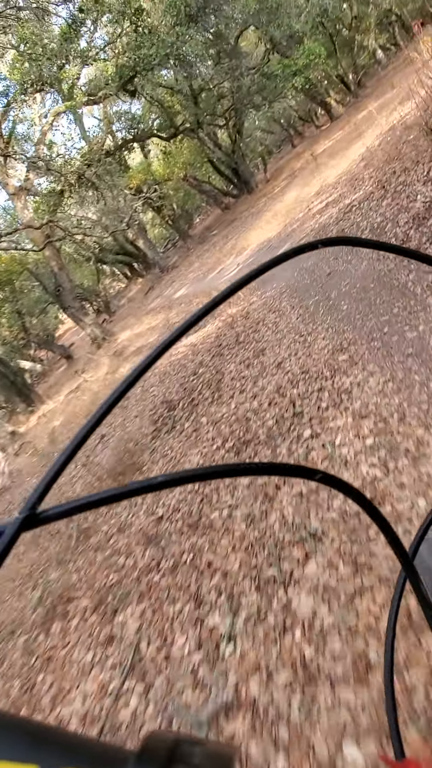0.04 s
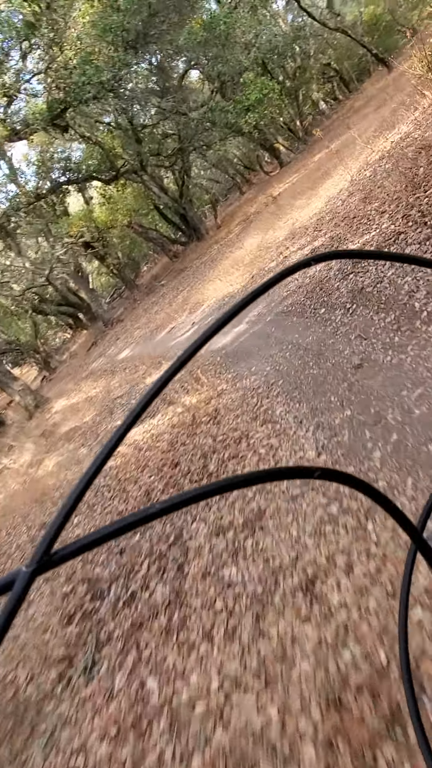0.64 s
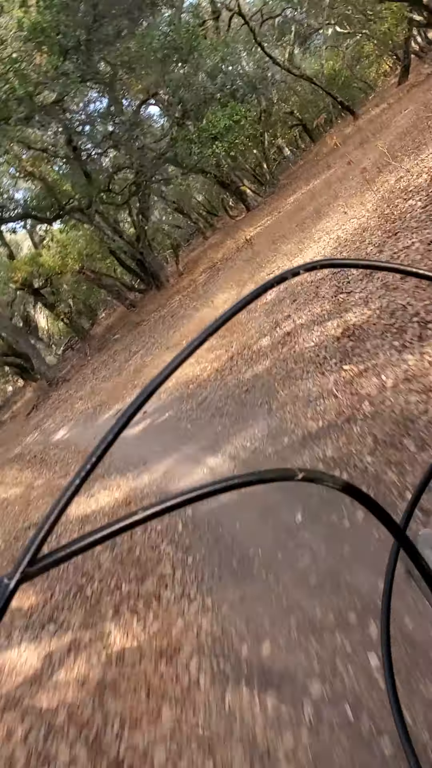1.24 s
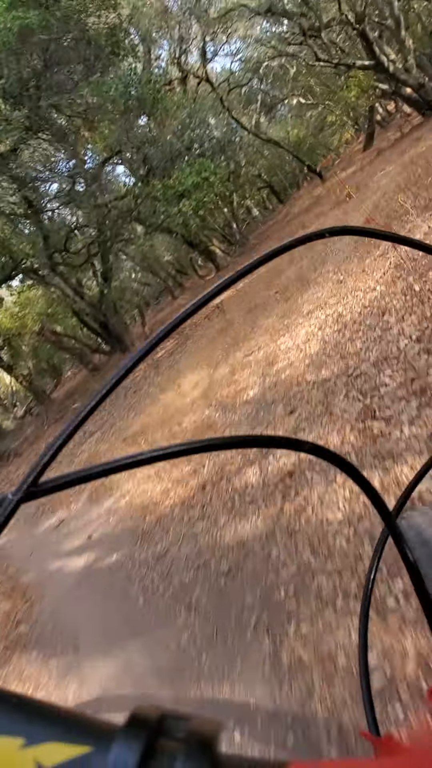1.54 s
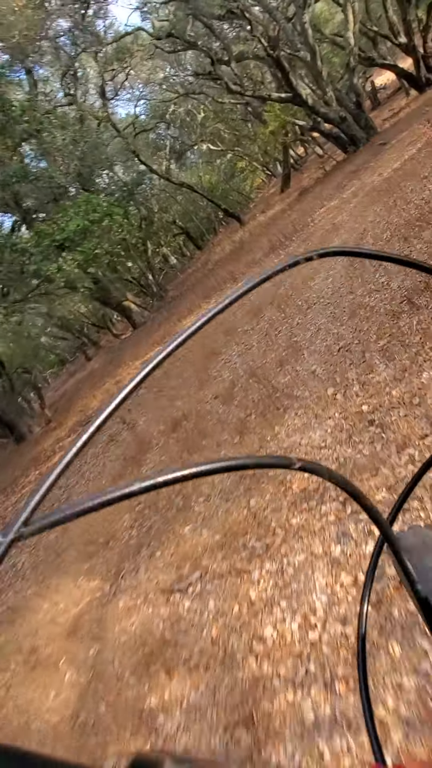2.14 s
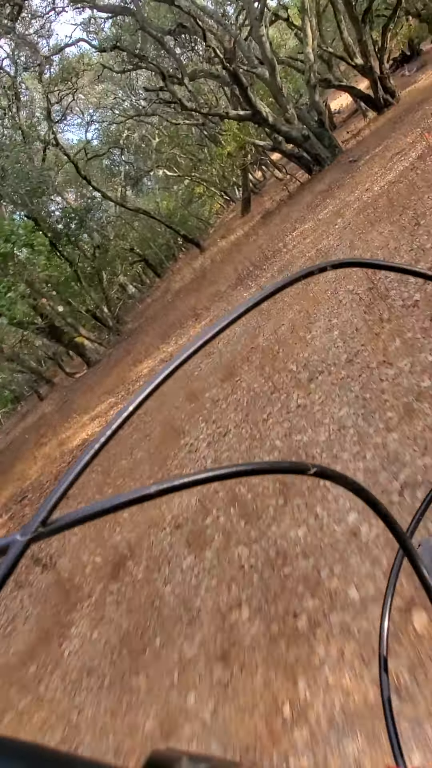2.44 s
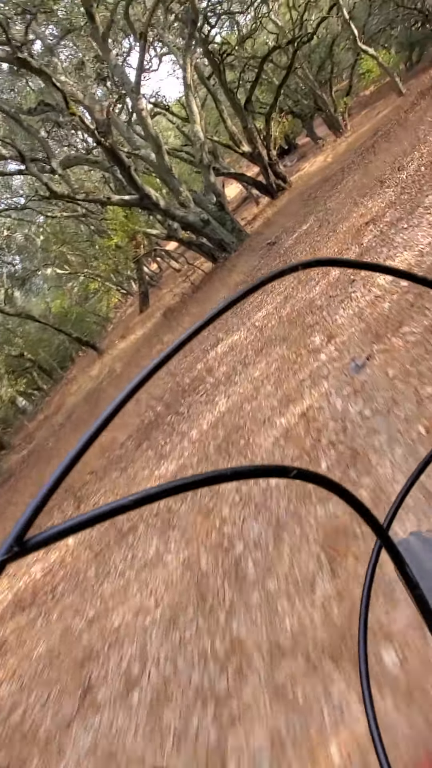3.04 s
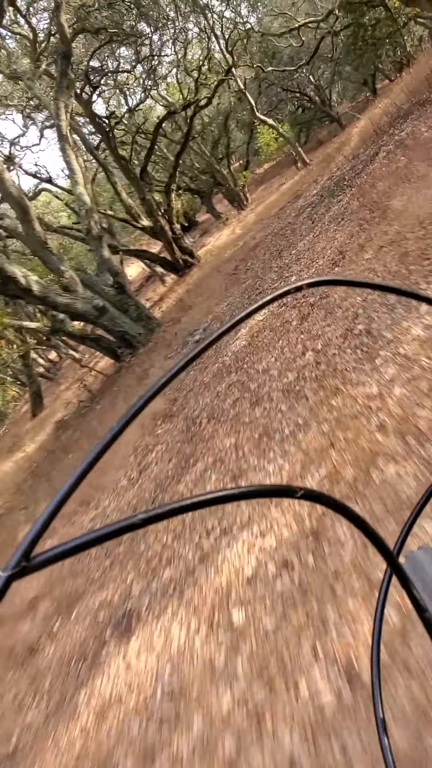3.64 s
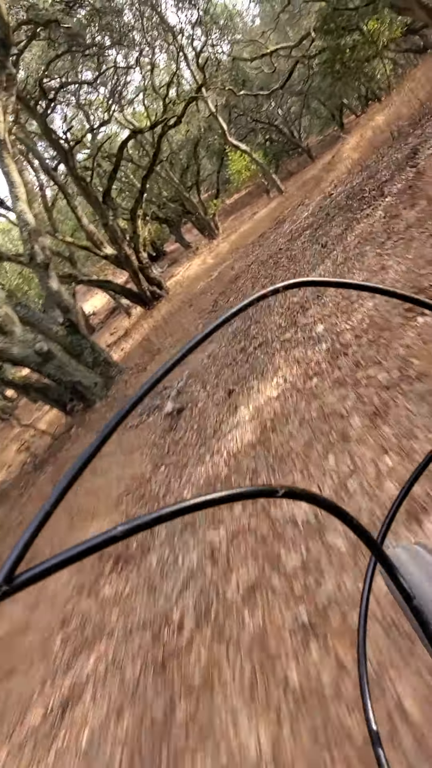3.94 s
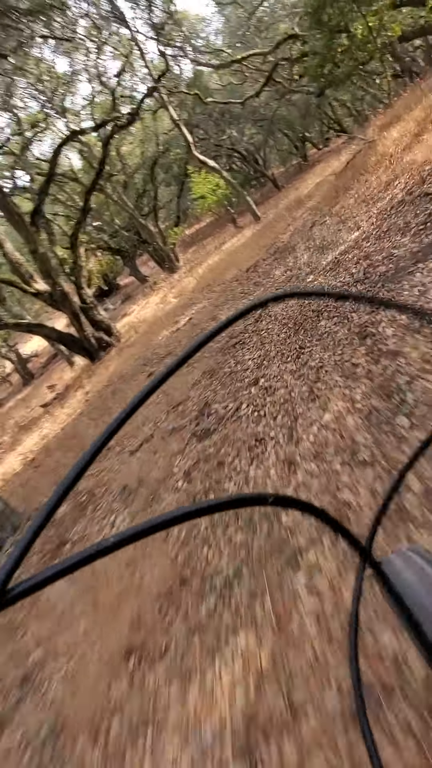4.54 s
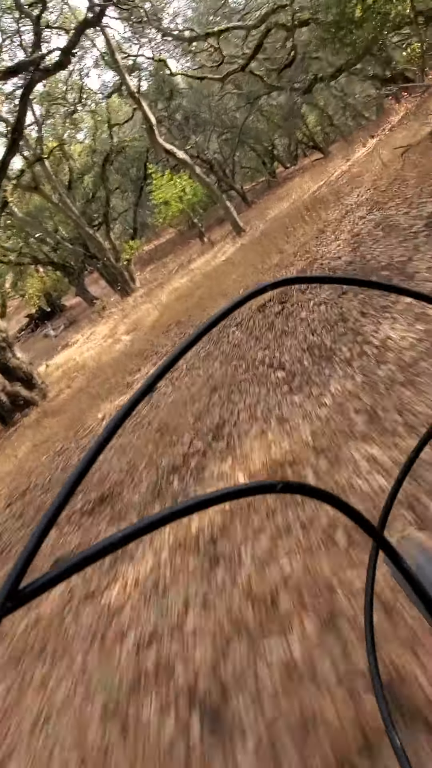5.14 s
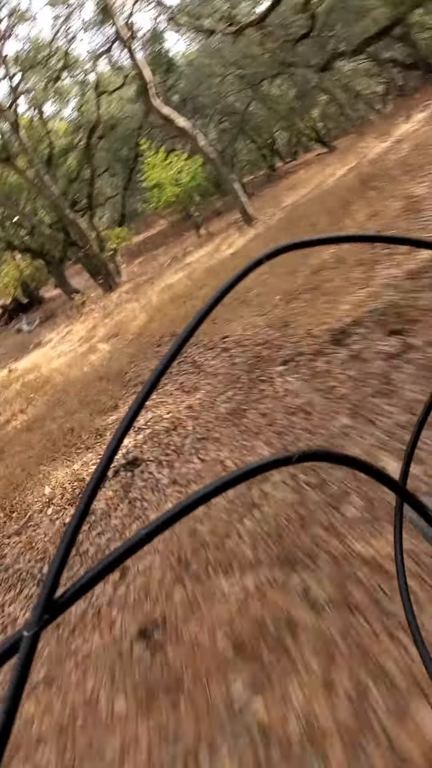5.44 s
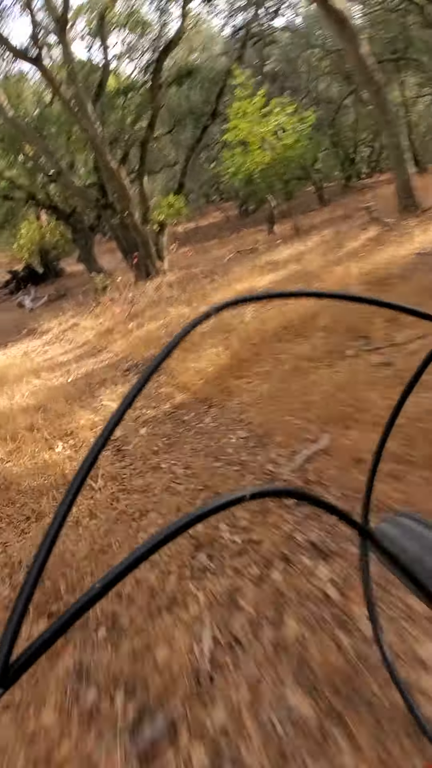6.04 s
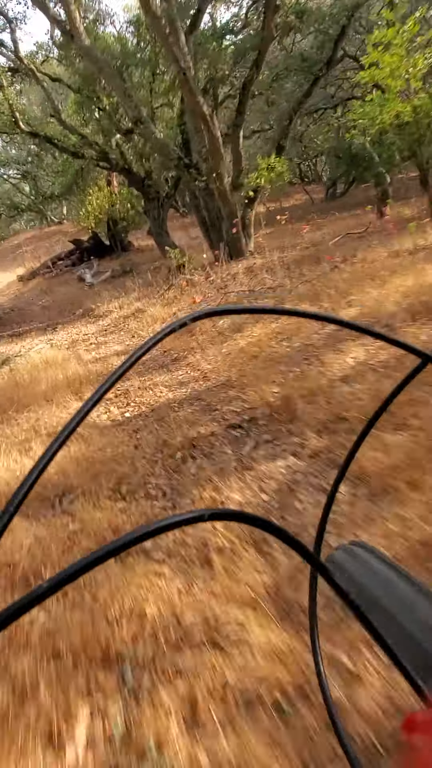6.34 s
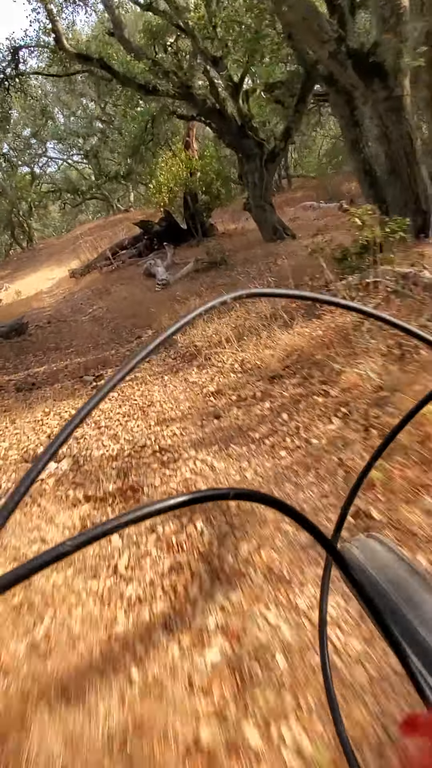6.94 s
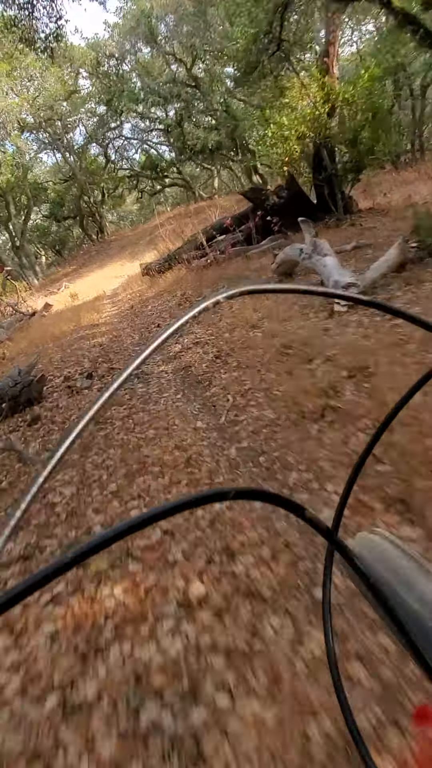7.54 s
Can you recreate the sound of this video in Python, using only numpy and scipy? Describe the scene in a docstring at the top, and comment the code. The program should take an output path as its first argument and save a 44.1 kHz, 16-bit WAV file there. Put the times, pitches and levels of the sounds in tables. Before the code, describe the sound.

Mountain bike tyres crunch over dry leaves and dirt, the frame knocking and rattling on bumps as wind buffets the microphone.

```python
"""Dry leaves crunch and a frame knocks as a mountain bike rolls down a dirt trail in open woodland.
Heard close up, from a camera on the rider with two microphone ports. Rough ground drums on the hollow
tyres, the tread crushes leaves and snaps twigs, bumps jolt and boom through the frame, and loose parts
clack and faintly ring. From three seconds on, the head wind buffets the ports."""
import sys
import numpy as np
from scipy import signal
from scipy.fft import rfft, irfft, next_fast_len
from scipy.io import wavfile
from scipy.ndimage import map_coordinates

SR = 44100
rng = np.random.default_rng(int(sys.argv[2]) if len(sys.argv) > 2 else 0)


def dump_mix(stems):
    """Bounce the given channels to the path in sys.argv[1] as a 16-bit WAV at rate SR."""
    frames = np.atleast_2d(stems).T  # one column per channel
    limited = np.clip(frames, -1, 1)  # hard clip at full scale
    pcm = np.round(limited * 32767).astype(np.int16)
    wavfile.write(sys.argv[1], SR, pcm)


N = 343539
TOP_HZ = 16050  # the camera's band limit

# Depth of the leaf litter under the tyres. Each row: time in seconds, relative crunch level in dB.
LEAF_LITTER = [(0, -40), (.2, -48.5), (.57, -44.5), (.88, -45), (1.3, -59), (1.6, -55), (1.95, -45),
               (2.5, -46), (2.8, -49.5), (3.47, -48.5), (3.69, -45), (4.7, -46), (5.2, -39), (5.72, -48.5),
               (6.03, -42.5), (6.33, -50), (7.16, -55.5), (7.79, -50.5)]
# Riding noise. Each row: time in seconds, relative levels of roar and of rumble in dB.
RIDE_LEVELS = [(0, -32, -35.5), (.4, -38, -42), (.95, -38, -40.5), (1.1, -34.5, -33), (1.53, -29, -33),
               (1.83, -36, -38), (2.4, -38.5, -41), (2.58, -32, -38.5), (3.08, -36.5, -42),
               (3.3, -33.5, -33), (3.65, -32, -35), (4.2, -31, -38.5), (5.1, -30.5, -33.5),
               (5.45, -30.5, -39), (6.02, -31, -40.5), (6.4, -37.5, -40.5), (7.1, -33, -41),
               (7.79, -32, -34.5)]
# Modes of the struck frame. Each row: frequency in Hz, relative level in dB, t60 in seconds.
FRAME_MODES = [(353, -8, 0.026), (814, -7.5, 0.031), (1607, -5, 0.027), (2156, 3, 0.009),
               (3150, -19, 0.006), (3790, 0, 0.007), (5970, -38, .008), (10030, -8.5, 0.023)]
# Colour of snaps, cracks and rattles. Each row: frequency in Hz, relative level in dB.
SNAP_SPECTRUM = [(400, 7.5), (1000, 7), (2100, 6.5), (3500, 0), (5000, -3.5), (7500, -15.5), (9800, 0),
                 (16000, -13)]


def amp(db):
    """Decibels to gain."""
    return 10 ** (np.asarray(db) / 20)


def unit(x):
    """Scale to rms 1."""
    return x / np.sqrt(np.mean(x ** 2) + 1e-20)


def curves(rows):
    """One value per sample for each column after the time."""
    times, *columns = np.transpose(rows)
    return [np.interp(np.arange(N) / SR, times, column) for column in columns]


def swells(rows, half_s):
    """A dB curve with one smooth swell for each (s, dB)."""
    t = np.arange(N) / SR
    return sum(db * np.exp(-np.minimum(((t - s) / half_s) ** 2, 20)) for s, db in rows)


def wobble(rate):
    """A smooth random curve, rate knots a second."""
    return map_coordinates(rng.standard_normal(int(N * rate / SR) + 4), [np.arange(N) * rate / SR])


def chance(per_s, level_db, scatter_db):
    """Random events (s, dB) whose strength follows a level curve."""
    when, size = rng.random((int(per_s * N / SR), 2)).T
    return list(zip(when * N / SR, level_db[(when * N).astype(int)] + scatter_db * (2 * size - 1)))


def filtered(x, response):
    """Filter x by a complex response of frequency."""
    size = next_fast_len(N + SR // 4)
    return irfft(rfft(x, size) * response(np.fft.rfftfreq(size, 1 / SR)), size)[..., :N]


def coloured(x, spectrum):
    """Give x a spectrum of (Hz, dB) points; white noise keeps its power."""
    points_hz, db = np.transpose(spectrum)
    return filtered(x, lambda hz: unit(amp(np.interp(np.log(hz + 1), np.log(points_hz), db))))


def resonance(hz, centre_hz, width_hz):
    """Complex response of one damped mode."""
    return 1j * hz * width_hz / (centre_hz ** 2 - hz ** 2 + 1j * hz * width_hz)


def resonate(x, modes):
    """Pass x through modes (Hz, width Hz, dB) of alternating sign."""
    return filtered(x, lambda hz: sum((-1) ** k * amp(db) * resonance(hz, centre, width)
                                      for k, (centre, width, db) in enumerate(modes)))


def struck(modes, t):
    """Three rows of dying modes (Hz, dB, t60 s), each excited at random strength."""
    return sum(amp(db - 60 * t / t60) * rng.standard_normal((3, 1)) * np.sin(2 * np.pi * hz * t)
               for hz, db, t60 in modes)


def blend(a, b, share):
    """Cross-fade from a to b at equal power."""
    share = np.clip(share, 0, 1)
    return np.sqrt(1 - share) * a + np.sqrt(share) * b


def ports(rows, direct, side=1, lag_s=0.000355):
    """Row 0 reaches both ports (side 1: right first, -1: left); rows 1 and 2 scatter, one to each."""
    late = filtered(rows[0], lambda hz: np.exp(-2j * np.pi * hz * lag_s))
    return blend(rows[1:], np.array([late, rows[0]])[::side], direct)


def pan(left_db):
    """Gains for a left-minus-right level."""
    return amp([[left_db / 2], [-left_db / 2]])


def add(track, s, sound):
    """Mix a sound into a track at time s."""
    part = track[..., max(0, round(s * SR)):][..., :sound.shape[-1]]
    part += sound[..., :part.shape[-1]]


def lumpy_noise(spectrum, lumpy_db, rate):
    """Noise that comes in quick lumps like turbulence, unrelated at the two ports."""
    lumps = amp(lumpy_db * np.array([wobble(rate), wobble(rate)]))
    return unit(coloured(lumps * rng.standard_normal((2, N)), spectrum))


def singing_metal(level_db=-58, flicker_db=5.0):
    """Constant shaking keeps the bike's metal parts faintly ringing."""
    # Each row: frequency in Hz, width in Hz, relative level in dB.
    metal_modes = [(1620, 90, 4.5), (4743, 50, -6.5), (9460, 100, -8.5), (14905, 110, -4)]
    shaking = amp(flicker_db * wobble(30)) * rng.standard_normal((2, N))
    return amp(level_db) * unit(resonate(shaking, metal_modes))


def clink(start_s=1.517, db=-31, bounces=4, gap_s=0.0097, t60=0.047):
    """Just before a hard bump, a loose steel part chatters against the frame."""
    # Each row: frequency in Hz, relative level in dB.
    steel_modes = [(2950, -4), (3650, -4.5), (4750, -23), (5700, -9), (9400, -13)]
    out, t = np.zeros((3, N)), np.arange(SR // 8) / SR
    for bounce in range(bounces):
        ring = struck([(hz, level, t60) for hz, level in steel_modes], t)
        add(out, start_s + bounce * gap_s, amp(db) * ring)
    return ports(out, direct=0.43)


def twigs_and_pebbles(t60=0.073, ring_db=-14):
    """Twigs snap and pebbles flick off the tread, faintly ringing the frame."""
    # Each row: start in seconds, relative level in dB.
    loud_ticks = [(1.486, -29.5), (2.1, -27.5), (2.1944, -25.5), (2.7018, -28), (4.25, -27), (5.509, -23),
                  (5.6305, -20.5), (6.6378, -27.5)]
    small_twigs = chance(per_s=9, level_db=curves(LEAF_LITTER)[0] + 5.5, scatter_db=6)
    snaps, rings, t = np.zeros((3, N)), np.zeros((3, N)), np.arange(SR // 16) / SR
    for s, db in loud_ticks + small_twigs:
        add(snaps, s, amp(db - 5.0 - 60 * t / t60) * rng.standard_normal((3, len(t))))
        add(rings, s, amp(db + ring_db) * struck(FRAME_MODES, t))
    return ports(coloured(snaps, SNAP_SPECTRUM) + rings, direct=0.17)


def clacks(rear_delay_s=0.1362, crack_t60=0.011):
    """A root slaps cable or chain on the frame, once per wheel: its modes ring under a short crack."""
    # Each row: start in seconds, relative levels of front ring, rear ring and crack in dB.
    roots = [(1.181, -1.5, -6.5, -5), (3.6019, -6, -14.5, -9.5)]
    rings, cracks, t = np.zeros((3, N)), np.zeros((3, N)), np.arange(SR // 16) / SR
    rise = 1 - np.exp(-t / 0.00057)
    front = [(s, ring_db, crack_db) for s, ring_db, _, crack_db in roots]
    rear = [(s + rear_delay_s, ring_db, crack_db) for s, _, ring_db, crack_db in roots]
    for s, ring_db, crack_db in front + rear:
        ring = sum((-1) ** k * amp(db + rng.standard_normal() - 60 * t / t60)
                   * np.sin(2 * np.pi * hz * t) for k, (hz, db, t60) in enumerate(FRAME_MODES))
        add(rings, s, amp(ring_db) * ring * rise)
        crack_fade = amp(crack_db + 1.0 - 60 * t / crack_t60) * rise
        add(cracks, s, crack_fade * rng.standard_normal((3, len(t))))
    cracks = coloured(cracks, SNAP_SPECTRUM)
    return ports(rings, direct=1.0) * pan(left_db=-1.5) + ports(cracks, direct=0.047)


def jolts(shake_hz=97, heave_hz=42, heave_db=-8, shake_s=0.039):
    """Each dip in the trail shakes bike and camera for a few slow cycles, over one deeper heave."""
    # Each row: start in seconds, relative level in dB.
    dips = [(0.019, -23.5), (0.128, -23.5), (0.5, -21.5), (.654, -21.5), (0.721, -24), (0.906, -26.5),
            (1.26, -24), (1.373, -25), (1.526, -22.5), (1.964, -29), (2.426, -28), (2.755, -22.5),
            (3.16, -22.5), (3.905, -23.5), (4.482, -25), (5.302, -23.5), (6.14, -23.5)]
    out, t = np.zeros(N), np.arange(SR // 4) / SR
    heave = amp(heave_db) * np.sin(2 * np.pi * heave_hz * t) * np.exp(-t * heave_hz / 2)
    envelope = (1 - np.exp(-t / 0.0025)) * np.exp(-(t / shake_s) ** 2)
    for s, db in dips:
        shake = np.sin(2 * np.pi * shake_hz * t * (1 + 0.066 * rng.standard_normal()))
        add(out, s, amp(db + 3.5) * (shake + heave) * envelope)
    return out * pan(left_db=1.5)


def knocks(relative_width=0.26, bump_hz=422, bump_t60=0.074, bump_rattle_db=-27):
    """Hard hits and small chance bumps boom in the frame, with a brief rattle on top."""
    # Each row: start in seconds, relative level in dB, pitch in Hz, t60 in seconds, rattle offset in dB.
    hard_hits = [(0.003, -23.5, 560, 0.09, -15.5), (1.32, -16.5, 433, 0.068, -17),
                 (1.519, -31, 600, 0.31, -4), (1.551, -15, 548, 0.21, -21.5),
                 (3.151, -24.5, 435, 0.12, -14), (3.186, -21, 300, 0.094, -22),
                 (3.315, -25.5, 450, .12, -29), (3.357, -16, 463, 0.04, -27),
                 (3.738, -25.5, 844, 0.091, -11), (3.905, -23, 405, 0.32, -12),
                 (3.941, -14, 533, 0.16, -28), (5.22, -25, 600, 0.39, -8.5),
                 (5.2827, -8.5, 526, 0.061, -11), (5.294, -9, 380, 0.081, -16),
                 (7.576, -28, 710, 0.25, -15)]
    bumps = chance(per_s=4, level_db=curves(RIDE_LEVELS)[0] + 3.5, scatter_db=3)
    small_hits = [(s, db, bump_hz, bump_t60, bump_rattle_db) for s, db in bumps]
    boom, rattle, t = np.zeros((3, N)), np.zeros((2, N)), np.arange(SR // 3) / SR
    hz = np.fft.rfftfreq(len(t), 1 / SR)
    for s, db, pitch_hz, t60, rattle_db in hard_hits + small_hits:
        body = resonance(hz, pitch_hz, relative_width * pitch_hz) / (1 + (hz / 1100) ** 4)
        fade = amp(-60 * t / t60) * (1 - np.exp(-t / 0.00063))
        ring = fade * irfft(rfft(rng.standard_normal((3, len(t)))) * body, len(t))
        ring *= np.linalg.norm(fade) / np.linalg.norm(ring, axis=1, keepdims=True)
        add(boom, s, amp(db + 3.5) * ring)
        rattle_fade = amp(db + rattle_db + 6.5 - 60 * t / (0.63 * t60))
        add(rattle, s, rattle_fade * rng.standard_normal((2, len(t))))
    return ports(boom, direct=0.58, side=-1) * pan(left_db=-4.0) + coloured(rattle, SNAP_SPECTRUM)


def tyre_hum():
    """Rough ground drums on the hollow tyres."""
    # Each row: frequency in Hz, relative level in dB.
    ground_spectrum = [(100, -11), (200, 1), (750, -2), (1100, -13), (4000, -26)]
    # Each row: frequency in Hz, width in Hz, relative level in dB.
    tyre_modes = [(212, 99, -10.5), (334, 140, -1), (438, 66, 4), (574, 115, -4.5), (736, 93, -4.5)]
    drumming = lumpy_noise(ground_spectrum, lumpy_db=3, rate=50)
    return unit(resonate(drumming, tyre_modes)) * amp(-1.4) * pan(left_db=-1.0)


def head_wind(deep_share):
    """Turbulence roars right at the microphone ports; deep_share of it is big, deep eddies."""
    # Each row of both: frequency in Hz, relative level in dB.
    roar_spectrum = [(60, -35), (150, -8), (300, 0), (430, 0.5), (580, -3.5), (800, -16), (1200, -30),
                     (3000, -51)]
    deep_spectrum = [(60, -30), (140, -1), (220, -1), (400, -8), (600, -14.5), (760, -10), (1100, -18),
                     (3000, -51)]
    roar = lumpy_noise(roar_spectrum, lumpy_db=4.5, rate=120)
    deep_eddies = lumpy_noise(deep_spectrum, lumpy_db=5.0, rate=170) * pan(left_db=3.5)
    return blend(roar, deep_eddies, deep_share)


def tyres_and_wind():
    """The roar passes from tyres to head wind, while a low rumble runs underneath and air flutters at the ports
    throughout."""
    # The wind takes over. Each row: time in seconds, its share of the roar from 0 to 1.
    wind_shares = [(3.05, .05), (3.18, .93)]
    # Deep eddies out of the bend. Each row: time in seconds, their share of the wind from 0 to 1.
    eddy_shares = [(6.1, 0.13), (6.6, 0.89)]
    # Gusts swell the roar and flutter briefly. Each row: centre in seconds, boost of the roar in dB.
    surges = [(2.22, 4.5), (3.19, 6.5), (3.34, 5.5), (4.5, 4.5), (4.84, 5.5), (5.08, 5), (5.9, 2.5),
              (6.06, 5), (7.6, 2.5)]
    # Each row of both: frequency in Hz, relative level in dB.
    rumble_spectrum = [(12, -34), (28, -15.5), (60, -0.5), (98, 0), (135, -7.5), (220, -11), (500, -60)]
    flutter_spectrum = [(400, 3.5), (800, 7), (1150, -2.5), (1600, -8), (2300, -5), (4000, -35),
                        (8000, -32)]
    roar_db, rumble_db = curves(RIDE_LEVELS)
    (wind_share,), (deep_share,) = curves(wind_shares), curves(eddy_shares)
    surge_db = swells(surges, half_s=0.07)
    roar = amp(roar_db + surge_db + 5.0) * blend(tyre_hum(), head_wind(deep_share), wind_share)
    rumble = amp(rumble_db + 7.5) * lumpy_noise(rumble_spectrum, lumpy_db=2.5, rate=29)
    flutter_db = -42 + 0.5 * wind_share + deep_share + 1.13 * surge_db + wobble(9)
    flutter = amp(flutter_db) * lumpy_noise(flutter_spectrum, lumpy_db=5.5, rate=150)
    return roar + rumble * pan(left_db=6.5) + flutter


def fractures(per_s, size_db, life_s, samples=100):
    """Breaking leaves: three rows (rms 1) of tiny damped pings, random in time, pitch and size."""
    when, pitch, size = rng.random((3, int(3 * N / SR * per_s), 1))
    t = np.arange(samples) / SR
    strength = amp(-size_db * np.log(np.maximum(size, 0.004)))
    pings = strength * np.exp(-t / life_s) * np.sin(2 * np.pi * pitch * TOP_HZ * t)
    at = (when * 3 * N).astype(int) + np.arange(samples)
    return unit(np.bincount(at.ravel(), pings.ravel(), 3 * N)[:3 * N].reshape(3, N))


def leaf_collapses(per_s=70, depth=0.54, life_s=0.0083):
    """A gain of rms 1 that leaps up whenever a whole leaf collapses, then sinks back."""
    starts = (rng.random(N) < per_s / SR) * np.minimum(rng.exponential(size=N), np.pi)
    return unit(1 + depth * signal.lfilter([1], [1, -np.exp(-1 / (life_s * SR))], starts))


def leaf_crunch():
    """The tread crushes leaves in bursts: thousands of fractures and some ringing husks over a rustle."""
    # Each row: frequency in Hz, relative level in dB.
    crunch_spectrum = [(500, -30), (1100, -2), (1700, -1.5), (2700, -2), (3500, 1), (4300, -3), (5200, -7),
                       (6500, -11), (7700, -12.5), (8600, -5.5), (9500, 1.5), (11500, -1), (16000, 0)]
    # Brief swells (+) and lulls (-) in the crunch; the one at 1.535 s is a loose part rattling.
    # Each row: centre in seconds, level change in dB.
    crunch_swells = [(.07, -9), (0.424, 4.5), (.87, 4.5), (1.535, 3), (1.86, -5.5), (3.52, 6.5),
                     (6.13, 1.5), (6.47, -9)]
    cracks = fractures(per_s=1800, size_db=2.5, life_s=0.00068)
    husks = fractures(per_s=350, size_db=1.2, life_s=0.003, samples=350)
    rustle = rng.standard_normal((3, N))
    crunch = coloured(blend(blend(cracks, rustle, share=0.56), husks, share=0.2), crunch_spectrum)
    # the lower crunch comes straight from the tyre, the fizz from all around
    low = filtered(crunch, lambda hz: 1 / (1 + (hz / 6500) ** 8))
    fizz = pan(left_db=-1.2) * ports(crunch - low, direct=0.023)
    stereo = ports(low, direct=0.6) * amp(0.81 * wobble(110)) + fizz
    level_db = curves(LEAF_LITTER)[0] + swells(crunch_swells, half_s=0.032) + 6.8
    return stereo * leaf_collapses() * amp(level_db + 1.3 * wobble(45))


def scene():
    """Everything is close to the microphones and dry in the open wood."""
    rolling = leaf_crunch() + tyres_and_wind()
    return rolling + jolts() + knocks() + clacks() + clink() + twigs_and_pebbles() + singing_metal()


def record(dry):
    """The camera rounds off the highest peaks and keeps nothing above its band limit."""
    rounded = dry / (1 + dry ** 6) ** (1 / 6)
    return filtered(rounded, lambda hz: hz < TOP_HZ)


dry = scene()
out = record(dry)
dump_mix(out)
```